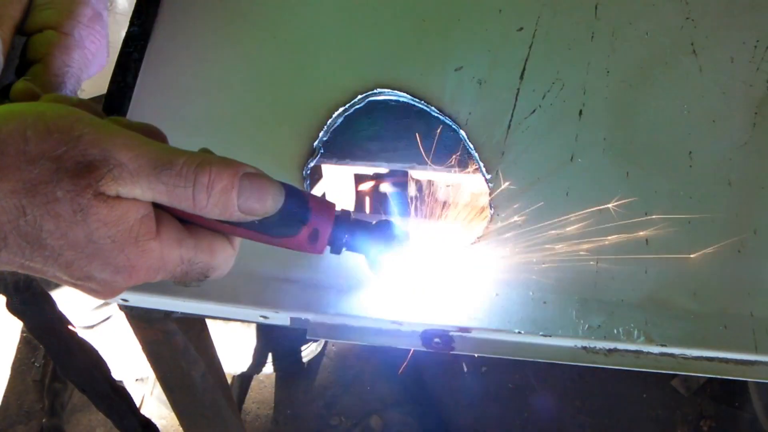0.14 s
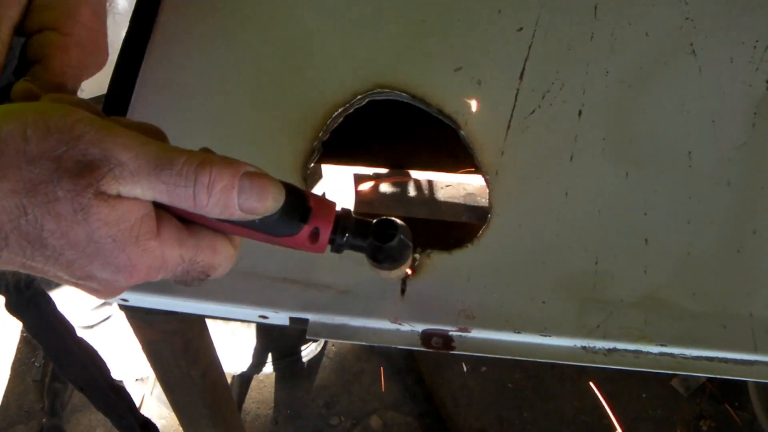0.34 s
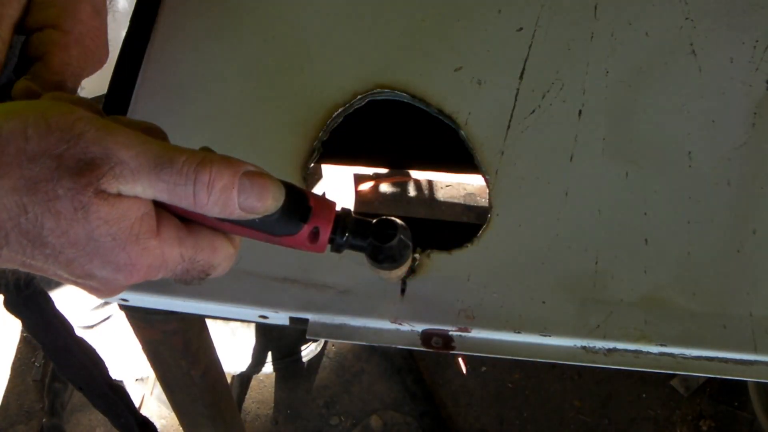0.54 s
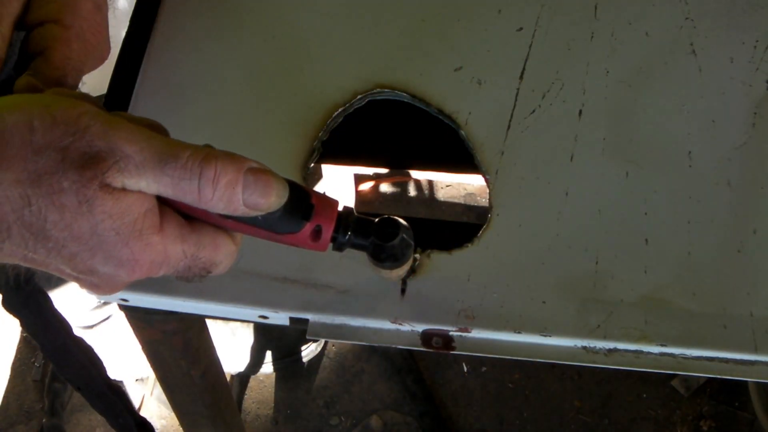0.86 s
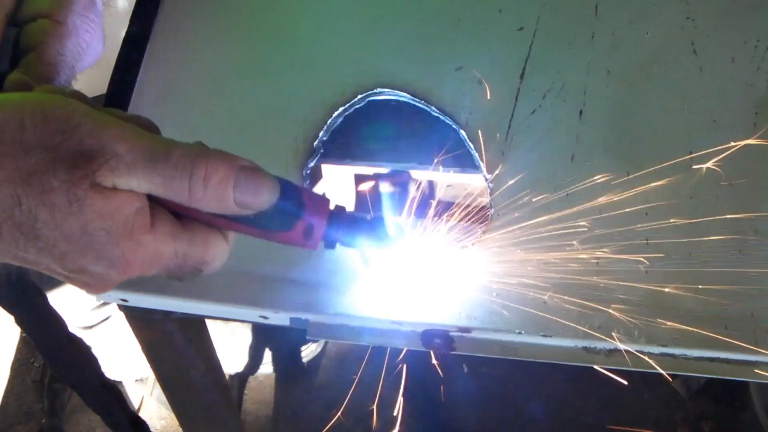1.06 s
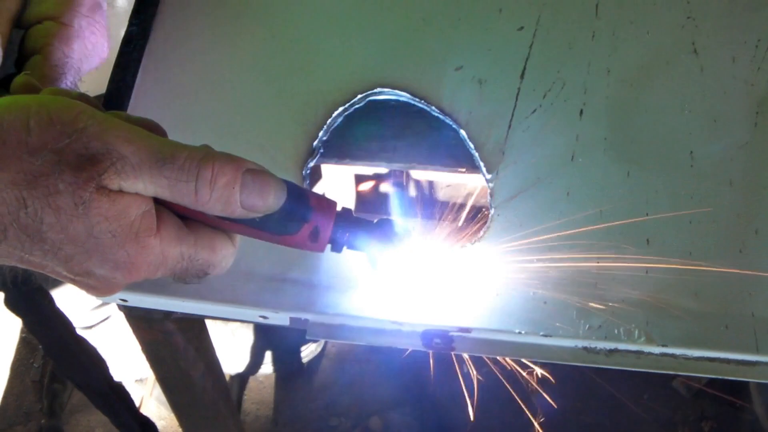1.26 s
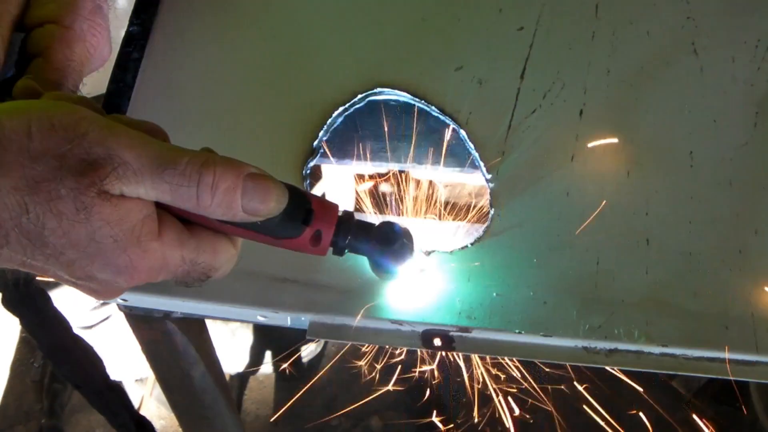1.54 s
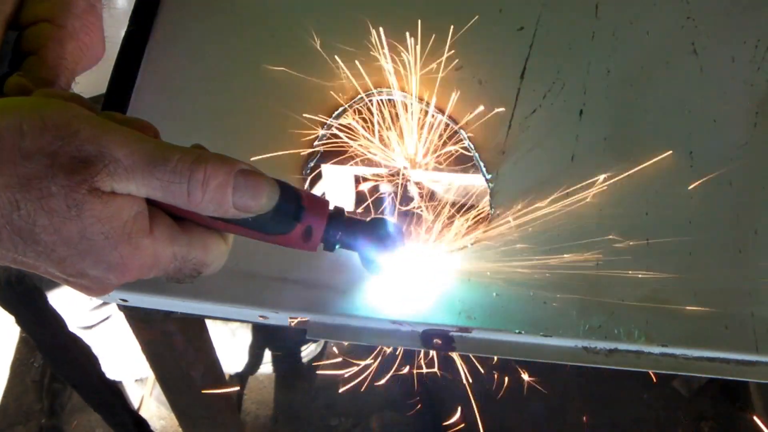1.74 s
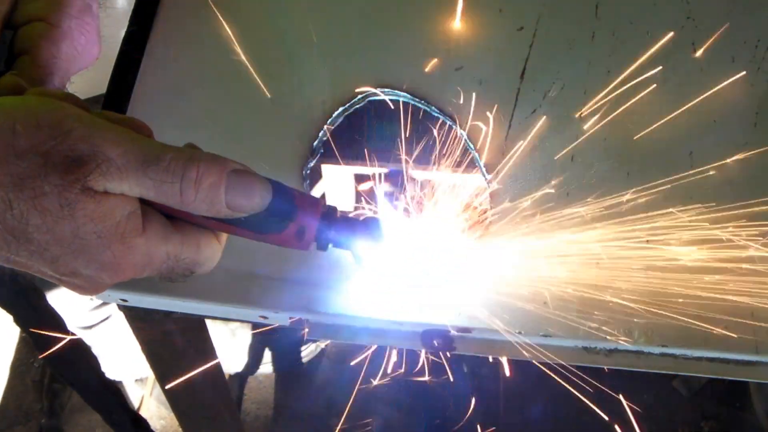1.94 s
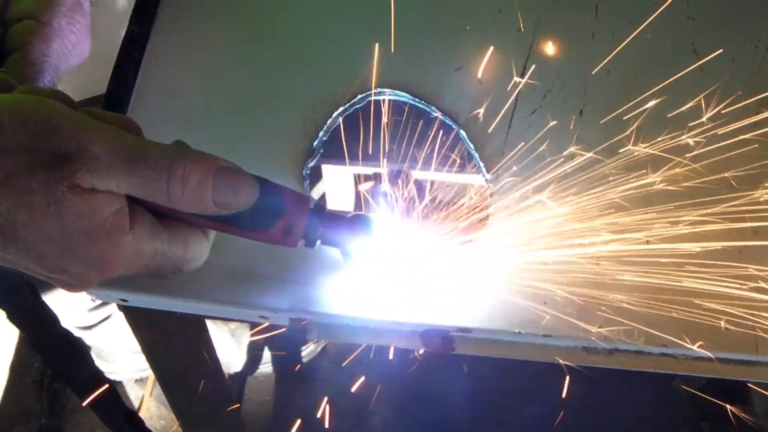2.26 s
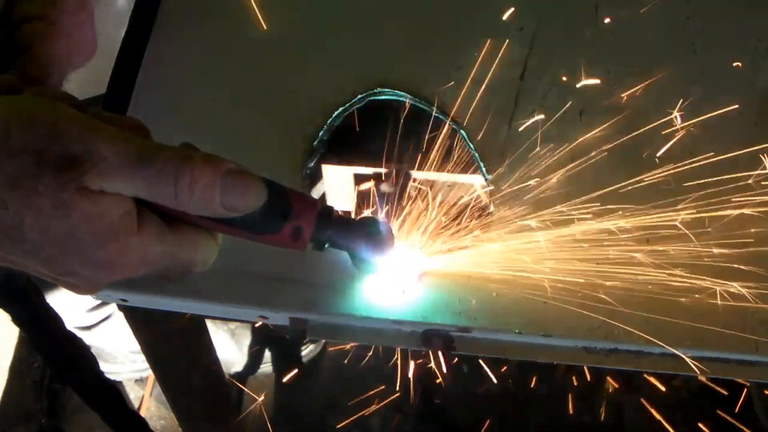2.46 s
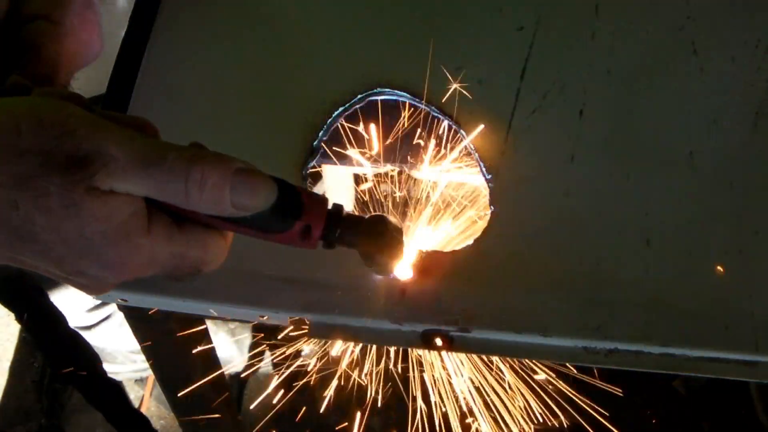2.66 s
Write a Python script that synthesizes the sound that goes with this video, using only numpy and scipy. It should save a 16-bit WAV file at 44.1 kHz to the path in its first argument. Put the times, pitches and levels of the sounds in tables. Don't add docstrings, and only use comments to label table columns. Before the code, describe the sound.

Plasma cutter on thin steel: loud air hiss, snapping arc strikes, bright sizzle and rough roar

```python
import sys
import numpy as np
from scipy import signal
from scipy.fft import rfft, irfft, next_fast_len
from scipy.io import wavfile

SR = 44100
rng = np.random.default_rng(int(sys.argv[2]) if len(sys.argv) > 2 else 0)


def put_to_file(sound):
    columns = np.atleast_2d(sound).T
    safe = np.clip(columns, -1, 1)
    whole_steps = np.round(safe * 32767)
    wavfile.write(sys.argv[1], SR, whole_steps.astype(np.int16))


def volts_from_decibels(level):
    exponent = np.asarray(level, float) / 20
    return 10 ** exponent


N = 123479
TIME = np.arange(N) / SR
SIZE = next_fast_len(N + 4096)
HZ = np.arange(SIZE // 2 + 1) * SR / SIZE + 1e-3


def rms_one(x):
    return x / np.sqrt(np.mean(x ** 2) + 1e-20)


def level(rows):
    return volts_from_decibels(np.interp(TIME, *np.transpose(rows)))


def at_hz(points):
    hz, value = np.transpose(points)
    return np.interp(np.log(HZ), np.log(hz), value)


def to_time(spectrum):
    return irfft(spectrum, SIZE)[:, :N]


def bell(centre_hz, width_hz):
    return 1 / (1 + (2 * (HZ - centre_hz) / width_hz) ** 2)


def resonances_db(rows):
    return sum(lift_db * bell(hz, width_hz) for hz, width_hz, lift_db in rows)


def drift(rate_hz):
    r = np.exp(-2 * np.pi * rate_hz * 40 / SR)
    noise = rng.standard_normal(N // 40 + 2002)
    slow = signal.lfilter([1], [1, -2 * r, r * r], noise)[2000:]
    return np.interp(np.arange(N) / 40, np.arange(len(slow)), rms_one(slow))


def stereo_white(extra=0):
    # (frequency [Hz], correlation)
    likeness = [(40, 0.37), (125, 0.87), (300, 0.92), (1000, .86), (2000, 0.89), (4000, 0.61), (8000, 0.72),
                (14000, 0.66)]
    mid, side = rng.standard_normal((2, N))
    alike = np.clip(at_hz(likeness), 0, 1)
    common = np.sqrt(1 + alike) * rfft(mid + extra, SIZE)
    return common + np.sqrt(1 - alike) * rfft(side, SIZE) * [[1], [-1]]


def turbulence(colour, peaks, gust_db, patchy_db, extra=0):
    spectrum = stereo_white(extra) * volts_from_decibels(at_hz(colour) + resonances_db(peaks))
    place = np.clip(2 * np.log2(HZ / 90), 0, 15)
    out = 0
    for k in range(16):
        band = np.clip(1 - abs(place - k), 0, 1)
        out = out + volts_from_decibels(patchy_db * drift(5.2)) * to_time(spectrum * band)
    return rms_one(out * volts_from_decibels(gust_db * drift(20.3)))


def crackle():
    rate_per_s, rms_db, spread_db = 700, -10, 3.5
    sizes = volts_from_decibels(spread_db * np.minimum(rng.exponential(1, N), 4))
    return volts_from_decibels(rms_db) * rms_one(sizes * (rng.random(N) < rate_per_s / SR))


def air():
    # (time [s], level [dB])
    jet_rows = [(0,-25.5),(.08,-25),(.1,-21.5),(.3,-24),(.37,-25.5),(.44,-22.5),(.48,-18),(.7,-16),(.94,-17.5),(.99,-15.5),(1.02,-28),(1.2,-32),(1.3,-22),(1.9,-24.5),(2.5,-29.5),(2.56,-27),(2.7,-32),(2.8,-22)]
    # (frequency [Hz], density [dB per Hz])
    jet_colour = [(150, -16.5), (700, -15.5), (1200, -12), (2500, -3), (6000, -3.5), (7500, -4),
                  (10500, -1.5), (16000, -10.5)]
    # (centre [Hz], width [Hz], lift [dB])
    jet_peaks = [(400, 80, 5.5), (960, 400, 9), (1450, 380, 7), (1725, 117, -12), (2300, 350, 1),
                 (3570, 250, 3.5), (3860, 120, 3.5), (5460, 860, 3.5), (6200, 1500, 5), (8580, 560, 4.5),
                 (9300, 280, -7.5), (13600, 540, 10), (15100, 440, 2)]
    return level(jet_rows) * turbulence(jet_colour, jet_peaks, gust_db=-0.24, patchy_db=1.13, extra=crackle())


def arc():
    # (time [s], level [dB])
    sizzle_rows = [(0,-32),(.084,-25),(.09,-16.5),(.32,-22),(.345,-27),(.99,-25.5),(.998,-14.5),(1.17,-16),(1.21,-21.5),(1.27,-17.5),(1.4,-20),(1.7,-18.5),(2.0,-17),(2.52,-16.5),(2.55,-23.5),(2.64,-17),(2.71,-20),(2.76,-28)]
    # (frequency [Hz], density [dB per Hz])
    sizzle_colour = [(300, -32.5), (1500, -17), (3500, -8.5), (5500, -4.5), (8400, -2), (10700, -2),
                     (14400, -4.5), (16000, -13)]
    # (centre [Hz], width [Hz], lift [dB])
    sizzle_peaks = [(406.5, 97, 22), (3670, 450, 7.5), (5320, 1200, 5.5), (8370, 440, 7),
                    (10660, 1230, 5.5), (11330, 240, 4.5), (12400, 270, 1.5), (13200, 870, 6),
                    (15450, 540, 9)]
    return level(sizzle_rows) * turbulence(sizzle_colour, sizzle_peaks, gust_db=0.3, patchy_db=0.45, extra=crackle())


def draught():
    # (time [s], level [dB])
    draught_rows = [(0, -58), (.4, -59), (.65, -42), (.95, -52), (1.03, -53), (1.13, -44), (1.36, -47),
                    (1.45, -77), (2.8, -83)]
    low = stereo_white() / (1 + (HZ / 150) ** 4) / (1 - 90j / HZ) ** 2
    return level(draught_rows) * volts_from_decibels(1.6 * drift(20)) * rms_one(to_time(low))


def power_supply():
    hum_hz, width_hz, hum_db = 124, 28, -59.5
    return volts_from_decibels(hum_db) * rms_one(to_time(stereo_white() * bell(hum_hz, width_hz)))


def blowout():
    # (time [s], level [dB])
    roar_rows = [(.084,-35.5),(.09,-21),(.17,-22),(.315,-21),(.35,-30),(.99,-49),(.998,-20.5),(1.04,-27.5),(1.18,-24),(1.23,-24),(1.29,-23.5),(1.53,-25.5),(1.58,-21),(1.85,-26.5),(2.05,-33.5),(2.54,-31),(2.66,-20.5),(2.712,-24.5)]
    # (frequency [Hz], density [dB per Hz])
    roar_colour = [(60, -27.5), (280, -11.5), (600, -6.5), (1500, 0), (2500, -4), (4500, -3.5),
                   (8000, -15.5), (16000, -29)]
    # (centre [Hz], width [Hz], lift [dB])
    panel_peaks = [(300, 86, 0), (401, 63, 6.5), (553, 20, 8), (655, 100, -2), (927, 170, 4.5),
                   (1478, 67, 6), (2475, 460, 4)]
    ends_s, fall_db_per_s = 2.716, 182
    dying = volts_from_decibels(-fall_db_per_s * np.maximum(TIME - ends_s, 0))
    roar = turbulence(roar_colour, panel_peaks, gust_db=0.74, patchy_db=1.0, extra=crackle())
    return level(roar_rows) * dying * roar


def pops():
    # (time [s], level [dB], decay [s], panel boom [dB re level], snap [dB re burst])
    strikes = [
        (0.0876, -15, 0.018, -33, -3),
        (0.9954, -16, 0.013, -12.5, 13),
        (1.158, -24, 0.0029, -9.5, 13),
        (1.285, -18, 0.0065, -38, -5),
        (1.587, -20, .005, -21, 1),
        (1.689, -26.5, 0.0091, -6.5, -3),
        (1.868, -35.5, 0.009, 0.5, -5),
        (2.68, -21, .01, -14, 8),
    ]
    panel_hz, panel_width_hz, boom_s = 410, 110, 0.024
    burst_rise_s, boom_rise_s, snap_s = 0.00067, 0.0013, 0.0012
    burst, boom = np.zeros(N), np.zeros(N)
    for start_s, pop_db, decay_s, boom_db, snap_db in strikes:
        age = np.maximum(TIME - start_s, 0)
        rise = np.clip(age / burst_rise_s, 0, 1)
        decay = np.exp(-age / decay_s) + volts_from_decibels(snap_db) * np.exp(-age / snap_s)
        burst += volts_from_decibels(pop_db) * rise * decay
        boom += volts_from_decibels(pop_db + boom_db) * (1 - np.exp(-age / boom_rise_s)) * np.exp(-age / boom_s)
    white = stereo_white()
    ring = white / (1 + 2j * (HZ - panel_hz) / panel_width_hz)
    crack = white / (1 + 1j * HZ / 7000) / (1 - 350j / HZ)
    return burst * rms_one(to_time(crack)) + boom * rms_one(to_time(ring))


def puffs():
    # (time [s], peak [dB], width [s])
    puff_rows = [(0.094, -23, 0.0036), (0.672, -35, 0.0024), (.71, -37, .003), (.76, -43, 0.0048),
                 (.9, -35, 0.0034), (.985, -37, .007), (1.118, -33, 0.0032), (1.15, -34, .005),
                 (1.287, -30, 0.003), (1.348, -35, 0.0056), (1.88, -55, 0.0048), (2.689, -46, 0.0035)]
    out = np.zeros((2, N))
    uneven = rng.standard_normal((len(puff_rows), 2, 1))
    for (start_s, peak_db, width_s), chance in zip(puff_rows, uneven):
        u = (TIME - start_s - 0.0012 * chance) / width_s
        out += volts_from_decibels(peak_db + 3.9 * chance) * u * np.exp(0.5 - u * u / 2)
    return out


def nearby_metal(x):
    # (delay [s], gain, extra delay on the left [s])
    echo_rows = [(.00043, .08, .00001), (.0017, .12, .00002), (.0034, -.13, -.00002), (.0059, .13, .00003),
                 (.0083, .12, -.00003), (.0131, -.13, .00004), (.0192, .13, .00004), (.0271, .12, -.00005),
                 (.0363, -.11, .00005)]
    # (centre [Hz], width [Hz], lift [dB])
    cabinet_peaks = [(405, 31, 3.5), (548, 49, -0.5), (753, 76, 0), (1615, 85, -1.5), (1830, 27, -4.5),
                     (10330, 540, 0.5), (15350, 500, 3)]
    comb, power = 1, 1
    for delay_s, gain, left_lag_s in echo_rows:
        delays_s = np.array([[delay_s + left_lag_s], [delay_s]])
        comb = comb + gain * np.exp(-2j * np.pi * HZ * delays_s)
        power += gain * gain
    hollow = volts_from_decibels(resonances_db(cabinet_peaks))
    return to_time(rfft(x, SIZE) * hollow * comb / np.sqrt(power))


def scene():
    torch = air() + arc() + blowout() + pops()
    return nearby_metal(torch) + draught() + power_supply() + puffs()


def band_limit(x):
    return signal.sosfilt(signal.butter(12, 16110, fs=SR, output="sos"), x)


def record(dry):
    # (frequency [Hz], left over right [dB])
    lean_rows = [(60, -0.5), (240, 1.5), (950, 1), (3770, 5), (15000, 3.0)]
    port_lag_s, ceiling = 1e-5, 1.4
    notch_hz, notch_width_hz, notch_depth = 7890, 73, 0.98
    bass_cut_hz, cutoff_hz = 60, 15700
    side = np.array([[0.5], [-0.5]])
    lag = np.exp(-2j * np.pi * HZ * port_lag_s * side)
    ports = irfft(rfft(dry, SIZE) * volts_from_decibels(at_hz(lean_rows) * side) * lag, SIZE)
    rounded = ceiling * np.tanh(ports / ceiling)
    notch = 1 - notch_depth * bell(notch_hz, notch_width_hz)
    colour = notch * (HZ < cutoff_hz) / (1 - 1j * bass_cut_hz / HZ) ** 3
    return band_limit(to_time(rfft(rounded) * colour))


dry = scene()
out = record(dry)
put_to_file(out)
```